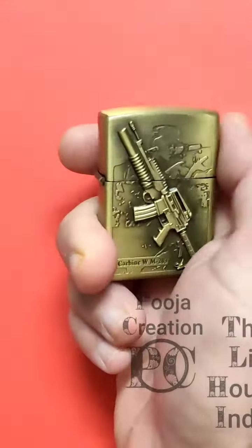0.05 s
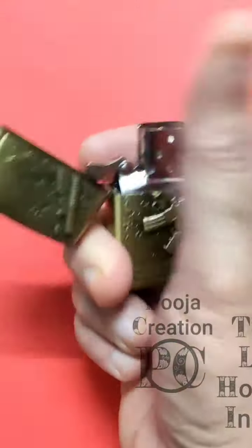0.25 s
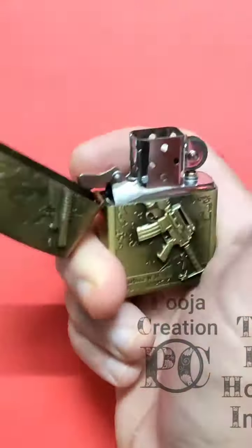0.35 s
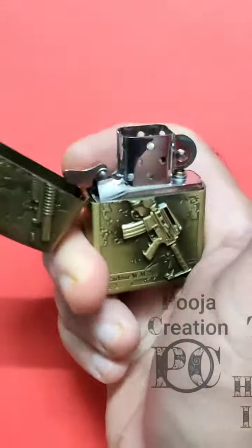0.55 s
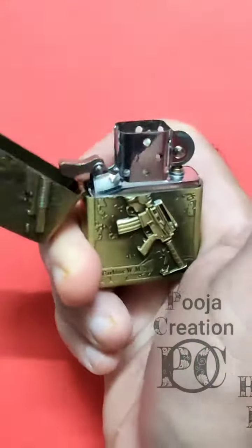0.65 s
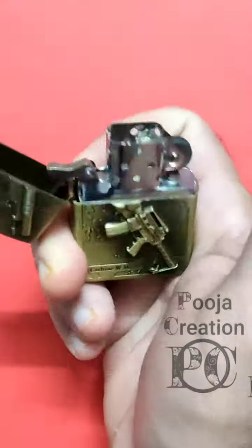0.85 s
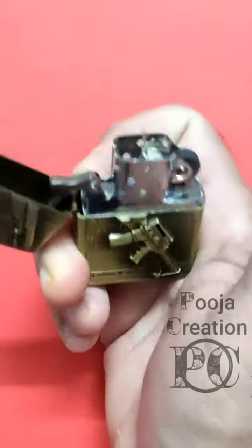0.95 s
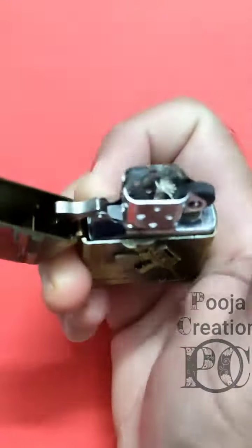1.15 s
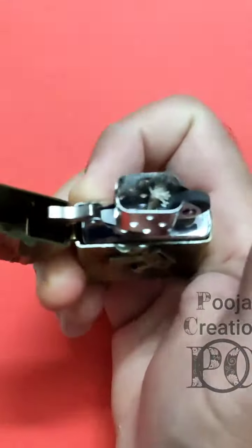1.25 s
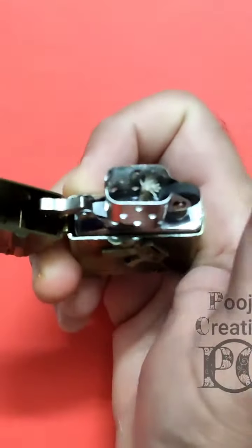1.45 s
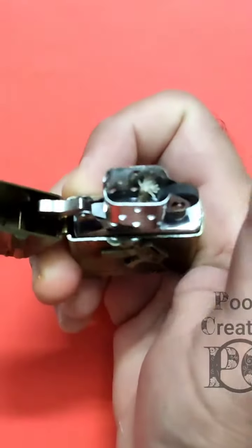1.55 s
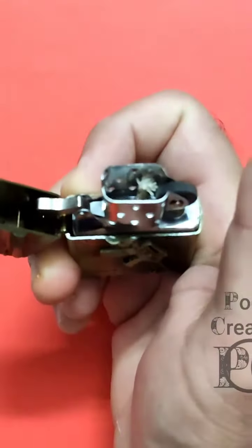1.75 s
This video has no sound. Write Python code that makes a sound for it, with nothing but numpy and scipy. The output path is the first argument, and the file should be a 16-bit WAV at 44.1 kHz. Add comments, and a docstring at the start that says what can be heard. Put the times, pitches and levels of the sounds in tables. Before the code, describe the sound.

A metal lighter lid flips open with one bright, briefly ringing clink.

```python
"""A thumb flips open a brass pocket lighter, close by in a small quiet room.
First the lid rubs on the case, and the cam (a small spring-loaded lever) ticks and scrapes along it.
At 0.2 s the lid hits its stop with one bright clink, and the metal rings briefly.
At about 0.7 s the loose hinge gives one faint tick; at 1.2 s the fingers softly shift their grip.
A low room hum lies underneath from start to end."""
import sys
import numpy as np
from scipy import signal
from scipy.fft import rfft, irfft
from scipy.io import wavfile

SR = 44100
rng = np.random.default_rng(int(sys.argv[2]) if len(sys.argv) > 2 else 0)


def unload_audio(sound):
    """Save the sound as a 16-bit wav file, at the path given as the first command line argument."""
    columns = np.transpose(np.atleast_2d(sound))
    # keep every value between -1 and 1, then stretch to whole-number steps
    steps = np.round(np.clip(columns, -1, 1) * 32767)
    wavfile.write(sys.argv[1], SR, steps.astype(np.int16))


N = 79380
T = np.arange(N) / SR

# the lid hitting its stop: t/s, level/dB, brightness/Hz
LID_STRIKES = [(.2008, 0.5, 16000)]


def clink():
    """The lid hits its stop: case and lid ring, and a dull knock passes through the hand."""
    # tones of the case, damped by the hand: f/Hz, level/dB, ring time/s, left over right/dB
    case_modes = [(1480, -23, 0.007, 12.5), (2348, -24, .022, 9), (2620, -25.5, 0.016, -5),
                  (2963, -12, 0.015, -3), (3190, -20, 0.02, 0), (3400, -15.5, 0.026, 7),
                  (5745, -8.5, 0.028, 6), (6160, -12.5, 0.01968, 0), (6240, -21, .016, -1),
                  (7130, -37, 0.02, 3), (7780, -36, .02, -3), (8000, -23.5, 0.03, -9), (8620, -33, 0.02, 0),
                  (9220, -28, .018, -0.5), (10020, -19.5, 0.015, 11.5), (10450, -20.5, 0.017, 6.5),
                  (10900, -16.5, 0.014, -1), (11750, -29, 0.014, -1.5), (12250, -35, 0.017, 0.5),
                  (13900, -23, 0.01605, -2), (14460, -16, .028, -5.5), (15100, -24.5, 0.021, -1),
                  (16300, -19.5, .018, -0.5), (15620, -14.5, 0.022, 2.5), (16200, -17, 0.0094, 0.5)]
    # tones of the lid, which rings longer: f/Hz, level/dB, ring time/s, left over right/dB
    lid_modes = [(2353, -40, .15, 2), (2478, -40, .15, 3), (2842, -41, .17, 0), (2934, -37, .15, 2),
                 (3192, -30, .17, 5), (3425, -26, .115, 1), (4390, -52, .14, 2), (4560, -53, .14, 4),
                 (4720, -51, .14, 2), (4950, -55, .14, 3), (5736, -34, .15, 5), (5898, -32, .16, 6),
                 (5985, -27, .165, 7), (6023, -32, .16, 6), (6094, -36, .16, 2), (6245, -42, .16, 3),
                 (7135, -28, .15, 6), (8010, -42, .16, -3), (8620, -47, .17, 3), (11620, -49, .15, 0),
                 (12214, -31, .145, -1), (13740, -44, .15, 0), (14740, -33, .135, 0), (15635, -45, .14, 2)]
    # tones of the knock: f/Hz, level/dB, ring time/s
    knock_modes = [(230, -32, .019), (570, -32.5, 0.019), (1150, -34, 0.007)]
    clicks, metal_modes = contacts(LID_STRIKES), case_modes + lid_modes
    tones = fading_tones(metal_modes, rise_s=.0006)
    # (-1) ** k makes neighbouring tones start in opposite directions
    response = sum((-1) ** k * pan(metal_modes[k][3]) * tone for k, tone in enumerate(tones))
    metal = cut_gaps(signal.fftconvolve(clicks[None], response, axes=1)[:, :N])
    knock = sum((-1) ** k * from_db(db) * ring(clicks, hz, ring_s)
                for k, (hz, db, ring_s) in enumerate(knock_modes))
    return from_db(1) * metal + pan(db=5.5) * knock


def crack(decay_s=.0013):
    """A few milliseconds of gritty noise as metal meets metal."""
    envelope = signal.lfilter([1], [1, -np.exp(-1 / (decay_s * SR))], contacts(LID_STRIKES))
    grit = filtered(envelope * rng.standard_normal((2, N)), "low", hz=15600)
    return pan(db=4) * from_db(-14) * cut_gaps(cut_bass(grit))


def cam(scrape_start_s=.176, scrape_db=-51.5, growth_db=15.5):
    """The cam ticks and scrapes as the lid swings, then ticks once more as it springs back."""
    # the cam slipping against the lid: t/s, level/dB, brightness/Hz
    cam_ticks = [(.1484, -27.5, 3034), (.1738, -5, 12400), (.1853, -10, 5000), (.1945, -13, 3000),
                 (.1966, -1, 9000), (.2056, 4, 2968)]
    # tones of the cam and closed case: f/Hz, level/dB, ring time/s
    cam_modes = [(2460, -18, 0.019), (2874, -28.5, .011), (3880, -27, .008), (4900, -30, .007),
                 (6180, -31.5, .014), (6720, -32, .014), (8050, -37, 0.012), (9700, -43, 0.0092),
                 (11780, -49, 0.02), (14900, -53.5, 0.011)]
    travel = (T - scrape_start_s) / (LID_STRIKES[0][0] - scrape_start_s)   # reaches 1 at the strike
    sliding = (travel > 0) * (travel < 1)
    scrape = from_db(scrape_db + growth_db * np.clip(travel, 0, 1)) * sliding * rng.standard_normal(N)
    scratch = from_db(-4.5) * filtered(scrape, "band", hz=[3000, 8000])
    response = fading_tones(cam_modes, rise_s=.0004).sum(axis=0)
    ringing = signal.fftconvolve(contacts(cam_ticks) + scrape, response)[:N]
    return pan(db=8) * cut_bass(ringing + scratch)


def hinge(tick_s=.7445):
    """The open lid settles on its loose hinge with one tiny tick."""
    # tones of the hinge: f/Hz, level/dB, ring time/s
    hinge_modes = [(2230, -52, .03), (2190, -69, .22), (2295, -69, .22)]
    click = signal.unit_impulse(N, int(tick_s * SR))
    response = fading_tones(hinge_modes, rise_s=.0006).sum(axis=0)
    return pan(db=3.5) * signal.fftconvolve(click, response)[:N]


def scuffs():
    """The lid rubs twice on the case as the thumb first lifts it."""
    rub = unit_level(filtered(rng.standard_normal(N), "band", hz=[2120, 2915]))
    first = from_db(-66.5) * swell(at_s=.127, width_s=.003)
    second = from_db(-67.5) * swell(at_s=.153, width_s=.012)
    return pan(db=5.5) * rub * (first + second)


def grip():
    """The fingers shift: skin rubs on the case with a soft, low thud."""
    rub = from_db(-79) * narrow_noise(hz=4600, width_hz=1100)
    thud = from_db(-67) * np.sin(2 * np.pi * 232 * T)
    return pan(db=8) * swell(at_s=1.21, width_s=.055) * (rub + thud)


def room(sound, low_ring_s=.235, high_ring_s=.22, split_hz=4400, build_s=.0039):
    """The walls return a few echoes and a short wash of sound whose treble dies a little sooner."""
    # wall echoes: delay/s, level/dB
    echoes = [(.0132, -12.5), (.0198, -22), (.0275, -20.5)]
    t = T[:SR // 2]
    noise = rng.standard_normal((2, len(t)))
    low = filtered(noise, "low", split_hz) * from_db(-60 * t / low_ring_s)
    high = filtered(noise, "high", split_hz) * from_db(-1 - 60 * t / high_ring_s)
    tail = (low - high) * (1 - np.exp(-(t / build_s) ** 2))
    response = from_db(-11.5) * unit_level(tail) / np.sqrt(len(t))
    for delay_s, db in echoes:
        arrivals_s = delay_s + rng.normal(0, .0002, 2)   # one for each ear
        response[[0, 1], (arrivals_s * SR).astype(int)] += from_db(db)
    sent = filtered(sound.mean(axis=0), "high", hz=650)
    sent = filtered(cut_gaps(sent), "low", hz=15800, order=12)
    return pan(db=3.5) * signal.fftconvolve(sent[None], response, axes=1)[:, :N]


def room_hum(likeness=.5, whine_end_s=.9, whine_fade_s=.27):
    """A steady low hum, with a thin whine that is gone halfway and a faint tone that swells late."""
    # shape of the hum from bass to treble: f/Hz, relative level/dB
    hum_shape = [(25, 0.5), (55, -9.5), (80, 0), (130, -6.5), (250, 2.5), (380, -6.5), (780, -6.5),
                 (1100, -12), (2000, -15.5), (4000, -18.5), (8000, -27), (12500, -24), (14500, -49.5),
                 (17000, -53.5)]
    # wavering tones in the hum: f/Hz, level/dB, width/Hz
    drone_tones = [(83, -83, 4), (251.7, -81, 25), (480, -85, 10), (760, -84, 30)]
    freqs = np.maximum(np.fft.rfftfreq(N, 1 / SR), 1)
    shape_hz, shape_db = np.transpose(hum_shape)
    gains = from_db(np.interp(np.log(freqs), np.log(shape_hz), shape_db))
    mid, side = irfft(rfft(rng.standard_normal((2, N))) * gains, N)
    # both ears share mid; they get side with opposite signs
    stereo = np.sqrt(1 + likeness) * mid + np.sqrt(1 - likeness) * side * [[1], [-1]]
    hum = from_db(-67) * unit_level(stereo)
    drones = sum(from_db(db) * narrow_noise(hz, width_hz) for hz, db, width_hz in drone_tones)
    fade = np.clip((whine_end_s - T) / whine_fade_s, 0, 1)
    whine = from_db(-75) * narrow_noise(hz=2870, width_hz=61) * fade
    late_tone = from_db(-79) * narrow_noise(hz=735, width_hz=4) * swell(at_s=1.48, width_s=.17)
    return pan(db=3.5) * (hum + drones + whine + late_tone)


def contacts(rows):
    """One click per row; a softer contact (lower brightness) gives a rounder click."""
    clicks = np.zeros(N)
    for at_s, db, brightness_hz in rows:
        decay = np.exp(-2 * np.pi * brightness_hz / SR)
        click = signal.unit_impulse(N, int(at_s * SR)) + 1e-18
        clicks += from_db(db) * signal.lfilter([1 - decay], [1, -decay], click)
    return clicks


def fading_tones(rows, rise_s):
    """Each tone swells as it spreads through the metal, and falls 60 dB over its ring time."""
    t = T[:SR // 2]
    tones = [from_db(db - 60 * t / ring_s) * np.sin(2 * np.pi * hz * t) for hz, db, ring_s, *_ in rows]
    return np.array(tones) * (1 - np.exp(-t / rise_s))


def ring(clicks, hz, ring_s):
    """Each click starts a pure tone that falls 60 dB in ring_s."""
    decay, angle = from_db(-60 / (ring_s * SR)), 2 * np.pi * hz / SR
    return signal.lfilter([0, np.sin(angle)], [1, -2 * decay * np.cos(angle), decay ** 2], clicks + 1e-18)


def cut_gaps(x):
    """Turn down five bands between the groups of tones, so the clink sounds hollower."""
    # gaps between the groups of tones: f/Hz, width/Hz, level/dB
    gaps = [(3980, 500, -20.5), (5170, 350, -13.5), (6650, 250, -9.5), (7520, 610, -12), (12700, 640, -17)]
    for hz, width_hz, db in gaps:
        x = x - (1 - from_db(db)) * signal.lfilter(*signal.iirpeak(hz, hz / width_hz, fs=SR), x)
    return x


def cut_bass(x):
    """Small metal parts give off little bass."""
    return filtered(x, "high", hz=2000, order=4)


def filtered(x, keep, hz, order=2):
    """Keep the "low" side, the "high" side or a "band"; a higher order cuts more sharply."""
    return signal.sosfilt(signal.butter(order, hz, keep, fs=SR, output="sos"), x)


def narrow_noise(hz, width_hz):
    """Noise around one pitch: the narrower it is, the more it sounds like a tone."""
    freqs = np.fft.rfftfreq(N, 1 / SR)
    return unit_level(irfft(rfft(rng.standard_normal(N)) / (1 + ((freqs - hz) / width_hz) ** 2), N))


def swell(at_s, width_s):
    """A smooth rise and fall around one moment."""
    return np.exp(-((T - at_s) / width_s) ** 2)


def pan(db):
    """Left and right gains, with the left louder by db."""
    return from_db(np.array([[db], [-db]]) / 2)


def from_db(db):
    """Turn decibels into a factor to multiply by."""
    return 10 ** (np.asarray(db) / 20)


def unit_level(x):
    """Scale to an average (rms) level of 1."""
    return x / np.sqrt(np.mean(x ** 2) + 1e-20)


def scene(left_delay_s=.00014):
    """The lighter in its room; the direct sound reaches the left ear a moment after the right."""
    lighter = scuffs() + cam() + clink() + hinge()
    left, right = lighter + crack() + grip() + room_hum()
    late_left = np.interp(T - round(left_delay_s * SR) / SR, T, left)
    return np.array([late_left, right]) + room(lighter)


def record(dry, stop_hz=17900):
    """Round off the loudest peak and cut the highest treble."""
    return signal.sosfilt(signal.cheby2(14, 70, stop_hz, fs=SR, output="sos"), np.tanh(dry))


dry = scene()
out = record(dry)
unload_audio(out)
```